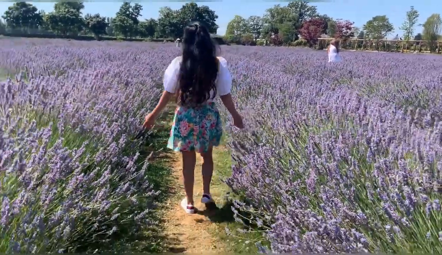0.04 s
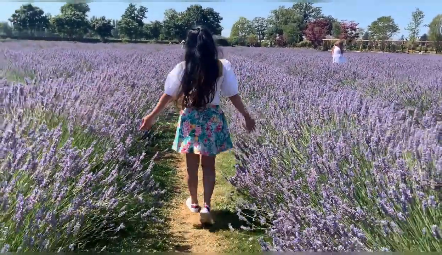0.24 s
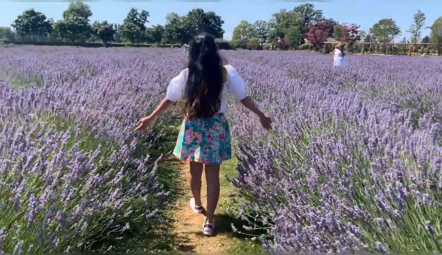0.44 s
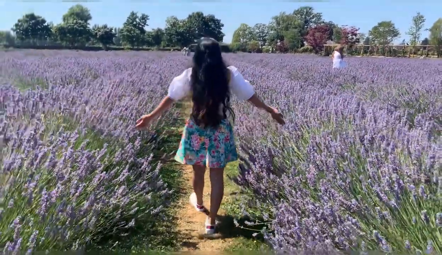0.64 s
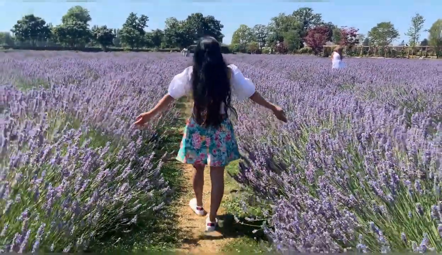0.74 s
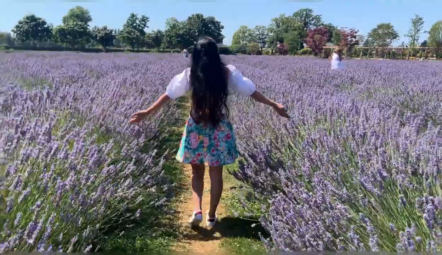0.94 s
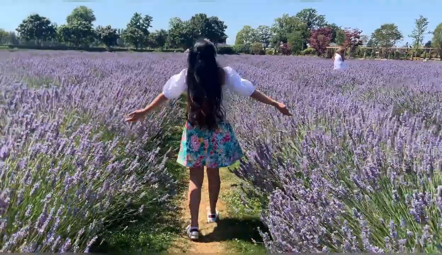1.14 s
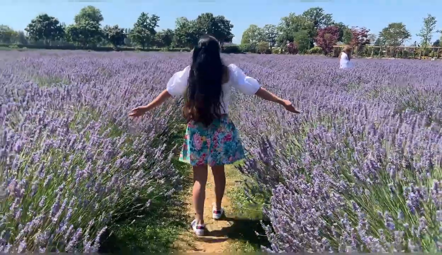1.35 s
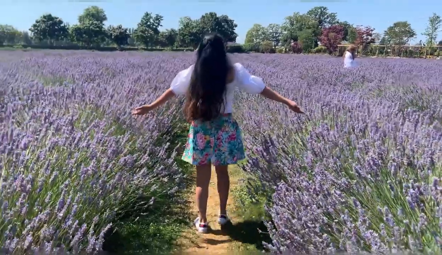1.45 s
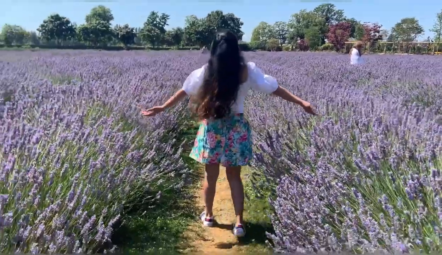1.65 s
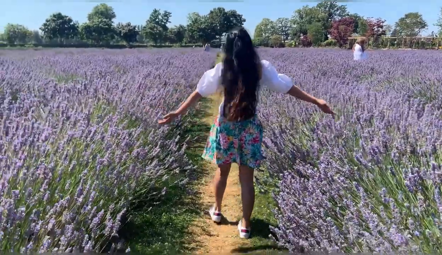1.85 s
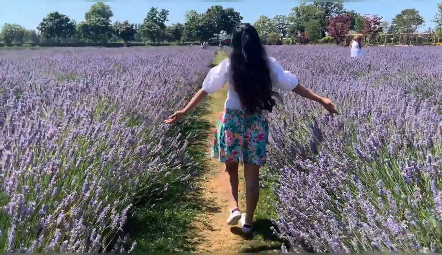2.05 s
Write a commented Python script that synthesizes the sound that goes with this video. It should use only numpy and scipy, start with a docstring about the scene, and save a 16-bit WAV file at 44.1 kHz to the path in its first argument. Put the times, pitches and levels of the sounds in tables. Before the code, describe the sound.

Low, uneven wind gusts buffet the microphone outdoors, swelling in the middle and then easing. Faint bees, light footsteps and brushing stems sit beneath, while faraway birds whistle, trill and give three short harsh calls.

```python
"""Bees in a windy field.

Bees hum over flowers, one insect passes, and gusts buffet the microphone.
Stems swish and soft steps scuff a dry path. Far off, small birds whistle, trill and chirp,
and a larger bird gives three short, harsh calls. Wingbeats and birds are wandering sines;
wind, leaves and steps are shaped noise, with short tone pulses for the eddies."""
import sys
import numpy as np
from scipy import signal
from scipy.fft import rfft, irfft
from scipy.io import wavfile

SR = 44100
rng = np.random.default_rng(int(sys.argv[2]) if len(sys.argv) > 2 else 0)


def bounce(signal):
    """Save signal as a 16-bit WAV file at the path given by the first command-line argument."""
    frames = np.transpose(np.atleast_2d(signal))
    limited = np.clip(frames, -1, 1)
    pcm = np.round(limited * 32767).astype(np.int16)
    wavfile.write(sys.argv[1], SR, pcm)


N = 92610
T = np.arange(N) / SR

# wind at the microphone, before trim: time_s, rumble_db, flutter_db
WIND_LEVELS = [(0, -44.5, -70), (0.061, -52.5, -68), (.15, -42, -65.5), (.205, -47, -61),
               (.25, -41.5, -48.5), (0.329, -39, -58), (.4, -50, -64), (.44, -41, -64), (0.479, -35, -57),
               (.55, -39.5, -58), (.6, -37, -68), (.65, -43, -76), (.73, -39.5, -66), (.765, -35.5, -36),
               (.81, -26.5, -32.5), (0.858, -37, -57), (0.93, -42.5, -48.5), (0.972, -36, -38.5),
               (1.021, -27.5, -45), (1.08, -44, -44.5), (1.14, -33, -37.5), (1.208, -38.5, -42),
               (1.28, -49.5, -52.5), (1.368, -40.5, -55), (1.43, -50.5, -65), (1.51, -41.5, -57.5),
               (1.72, -50.5, -50), (1.789, -40.5, -57), (1.9, -47.5, -58.5), (2.1, -53.5, -55.5)]
# side over mid, wide then central: time_s, rumble_db, flutter_db
WIND_WIDTH = [(0, 4.5, 10), (.53, -3.5, 13), (.62, -37, 14), (.75, -53, -31), (2.1, -50, -34)]
# low wind band: freq_hz, density_db
RUMBLE_SPECTRUM = [(10, -45), (25, -13), (38, -9.5), (54, 0), (80, -4.5), (120, -13), (170, -28),
                   (300, -60), (600, -105)]
# upper wind band: freq_hz, density_db
FLUTTER_SPECTRUM = [(60, -36), (110, 0), (165, -1), (230, -11.5), (300, -27), (420, -28), (600, -53),
                    (1500, -83)]
# wingbeat partials: harmonic, level_db, port_scatter_rad
BEE_PARTIALS = [(1, -63.5, 0.21), (2, -61, 1), (4, -72.5, 0.75), (5, -74.5, 0.65)]
# swell of the hum: time_s, gain_db
HUM_SWELL = [(0, 1), (.33, -2), (.7, -1), (1.25, -0.5), (1.5, 4), (1.78, 0.5), (2.1, 3)]
# far air and leaves: freq_hz, density_db
AIR_SPECTRUM = [(30, 12), (150, 0), (300, 1.5), (520, -1.5), (680, -2), (850, -2.5), (960, -1.5), (1070, 3),
                (1300, 0), (1650, -2.5), (2200, -10), (2800, -10), (3500, -15.5), (4800, -18),
                (6500, -19.5), (8000, -28.5), (12000, -21.5), (16000, -31.5)]
# left-right likeness of the air: freq_hz, correlation
AIR_CORRELATION = [(100, 1), (300, 0.64), (470, -0.043), (620, -0.46), (900, -0.25), (1400, 0.2),
                   (2100, -0.25), (2700, 0.12), (3200, -0.33), (4300, 0.31), (6000, -0.26), (16000, 0.13)]
# stems brushing past: peak_s, sigma_s, level_db
SWISHES = [(.01, 0.073, -70.5), (.268, 0.021, -65), (.725, 0.029, -69), (.88, 0.055, -62.5),
           (1.028, 0.026, -61.5), (1.235, 0.012, -66.5), (1.55, 0.085, -68.5), (1.62, .002, -67),
           (1.685, 0.039, -65.5), (1.83, 0.04, -65.5), (1.96, 0.061, -66.5), (1.996, 0.018, -67)]
# stem noise: freq_hz, density_db
SWISH_SPECTRUM = [(300, -3), (1200, 24), (2500, 19.5), (4500, 17), (7000, 8), (11000, 10.5), (15000, 5.5)]
# footfalls: peak_s, sigma_s, level_db, centre_hz
SCUFFS = [(0.038, 0.016, -62, 1075), (0.106, 0.038, -62, 1100), (0.322, 0.012, -60.5, 1070),
          (0.879, 0.0072, -61.5, 1280), (1.029, 0.0073, -51.5, 1070), (1.185, 0.013, -57.5, 1080),
          (1.629, 0.0073, -54.5, 1310)]
# footfall noise: centre_ratio, density_db
SCUFF_SPECTRUM = [(.3, -10), (.7, -12), (1, 10), (1.3, -10), (2, -25.5), (5.5, -29)]
# sharp gust edges: peak_s, sigma_s, level_db
GUST_EDGES = [(.28, 0.0099, -55), (.875, 0.025, -53.5), (.97, 0.01, -48), (1.075, 0.012, -42),
              (1.135, 0.014, -48), (1.2, 0.01, -48.5)]
# gust edge noise: freq_hz, density_db
GUST_EDGE_SPECTRUM = [(120, -46), (230, 10.5), (330, 1.5), (450, -6.5), (600, -23), (1200, -52)]
# long bird note: time_s, pitch_hz, level_db
WHISTLE_CONTOUR = [(.4, 4670, -85), (.49, 4595, -72.5), (.55, 4500, -65), (.572, 4510, -75),
                   (.64, 4527, -65.5), (.7, 4505, -67.5), (.755, 4445, -65.5), (.838, 4415, -65),
                   (.865, 4500, -69), (.895, 4340, -85)]
# harsh calls: start_s, length_s, first_hz, last_hz, level_db
CAWS = [(0.449, 0.064, 1910, 2120, -61.5), (1.33, 0.074, 1842, 2160, -55),
        (1.495, 0.075, 2237, 1935, -65.5)]
# lines of a harsh call: pitch_ratio, relative_db
CAW_LINES = [(0.81, -6.5), (0.903, -10), (1, -1), (1.096, -15), (1.189, -10), (1.267, -7)]
# eddies at the microphone: peak_s, level_db, centre_hz
EDDIES = [(0.488, -36, 175), (0.763, -23.5, 130), (0.8, -27, 162), (0.81, -24, 80.5), (0.851, -24, 109),
          (0.879, -31.5, 131.5), (1.077, -30, 185), (1.121, -38, 302), (1.136, -38.5, 312),
          (1.199, -25.5, 122)]
# buzzy trills: start_s, length_s, first_hz, last_hz, rate_hz, level_db, fade_db, port_rad
TRILLS = [(0.655, 0.32, 2810, 2900, 220, -69.5, 4, 2.15), (0.98, 0.38, 4736, 4600, 207, -64, 12, 1.55),
          (1.894, .115, 4500, 4050, 127, -68, 8, 1.1)]
# passing insect: time_s, wingbeat_hz, level_db
FLY_PASS = [(1.26, 307.6, -76), (1.4, 332.4, -63.5), (1.47, 341, -78.5), (1.58, 277.4, -70),
            (1.69, 238.4, -56), (1.8, 212, -72)]
# quick bird notes: start_s, length_s, first_hz, last_hz, arch_hz, level_db
CHIRPS = [(1.395, 0.046, 5200, 3770, -5, -75.5), (1.484, 0.067, 3560, 3510, 716, -69.5),
          (1.667, 0.035, 4996, 3550, 54, -75), (1.747, 0.064, 3610, 3530, 695, -67.5)]

WING_JITTER, WING_JITTER_HZ = .0219, 24.55


def amp(db):
    """Decibels to gain."""
    return 10 ** (np.asarray(db) / 20)


def unit(x):
    """Scales to rms 1."""
    return x / np.sqrt(np.mean(abs(x) ** 2) + 1e-20)


def log_interp(table, hz):
    """Reads a table on a log-frequency axis."""
    freq_hz, value = np.transpose(table)
    return np.interp(np.log(hz + 1), np.log(freq_hz + 1), value)


def curves(table):
    """Interpolates each column of a time table."""
    time_s, *columns = np.transpose(table)
    return [np.interp(T, time_s, column) for column in columns]


def drift(hz):
    """Low-passed random motion, rms about 1."""
    freq_hz = np.fft.rfftfreq(2 * N, 1 / SR)
    white = rfft(rng.standard_normal(2 * N))
    return unit(irfft(white * np.exp(-(freq_hz / hz) ** 2)))[:N]


def noise(spectrum, correlation=0):
    """Shaped stereo noise, rms 1; correlation is a number or a table."""
    hz = np.fft.rfftfreq(N, 1 / SR)
    if np.ndim(correlation):
        correlation = np.clip(log_interp(correlation, hz), -1, 1)
    mid, side = rfft(rng.standard_normal((2, N)))
    mid *= np.sqrt(1 + correlation)
    side *= np.sqrt(1 - correlation)
    return unit(irfft(np.array([mid + side, mid - side]) * amp(log_interp(spectrum, hz)), N))


def tone(hz, port_rad):
    """Sine of rms 1, with a phase difference between the two microphone ports."""
    phase = 2 * np.pi * (np.cumsum(hz) / SR + rng.random())
    return np.sqrt(2) * np.cos([phase, phase - port_rad])


def bursts(events, spectrum, grain_db, correlation=0):
    """Gaussian swells of grainy noise."""
    level = sum(amp(db) * np.exp(-.5 * ((T - peak_s) / sigma_s) ** 2) for peak_s, sigma_s, db in events)
    return level * noise(spectrum, correlation) * unit(amp(grain_db * drift(hz=504)))


def wind(smooth_s=.13):
    """Rumble and flutter at the microphone: levelled noise that follows the gusts."""
    out = np.zeros((2, N))
    window = signal.windows.hann(int(2 * smooth_s * SR))
    spectra, trims_db = (RUMBLE_SPECTRUM, FLUTTER_SPECTRUM), (-.5, -3)
    for spectrum, trim_db, db, width_db in zip(spectra, trims_db, curves(WIND_LEVELS), curves(WIND_WIDTH)):
        air = noise(spectrum)
        power = signal.fftconvolve(air ** 2, window[None] / window.sum(), "same", axes=1)
        mid, side = amp(db + trim_db) * air / np.sqrt(abs(power) + 1e-6)
        out += mid + np.outer([1, -1], amp(width_db) * side)
    return out


def bees(count=10, wingbeat_hz=209.13, spread=.045, wander=.022, swell_db=2.5, chorus_db=1.5):
    """Wingbeats wander and swell as bees move between flowers; the whole hum rises and falls."""
    out = np.zeros((2, N))
    for detune in np.sqrt(3) * spread * np.linspace(-1, 1, count):
        hz = wingbeat_hz * (1 + detune + wander * drift(hz=5.96) + WING_JITTER * drift(WING_JITTER_HZ))
        nearness = unit(amp(swell_db * drift(hz=3.8)))
        side = drift(hz=2.12)
        for harmonic, db, scatter_rad in BEE_PARTIALS:
            out += amp(db) * nearness * tone(harmonic * hz, side * scatter_rad)
    hum_db = curves(HUM_SWELL)[0] + chorus_db * drift(hz=24)
    return out * amp(hum_db) / np.sqrt(count)


def field(level_db=-57, swell_db=.4):
    """Soft wash of far air and leaves."""
    return amp(level_db + swell_db * drift(hz=21)) * noise(AIR_SPECTRUM, AIR_CORRELATION)


def stems():
    """Stems brush past in bright swishes."""
    return bursts(SWISHES, SWISH_SPECTRUM, grain_db=2)


def steps():
    """Each footfall scrapes the dry path with its own colour."""
    out = np.zeros((2, N))
    for peak_s, sigma_s, db, centre_hz in SCUFFS:
        spectrum = [(ratio * centre_hz, density_db) for ratio, density_db in SCUFF_SPECTRUM]
        out += bursts([(peak_s, sigma_s, db)], spectrum, grain_db=1.5)
    return out


def gust_edges():
    """Sharp gust edges hit the microphone as low puffs."""
    return bursts(GUST_EDGES, GUST_EDGE_SPECTRUM, grain_db=-.5, correlation=.74)


def whistle(waver_hz=8):
    """A small bird's thin, slowly sinking note."""
    hz, db = curves(WHISTLE_CONTOUR)
    gate = (T > WHISTLE_CONTOUR[0][0]) * (T < WHISTLE_CONTOUR[-1][0])
    return amp(db) * gate * tone(hz + waver_hz * drift(hz=83.6), port_rad=.68)


def caws(roughness=.012, port_rad=2.88):
    """A larger bird far to one side: gliding clusters of rough lines."""
    out = np.zeros((2, N))
    for start_s, length_s, first_hz, last_hz, db in CAWS:
        progress = np.clip((T - start_s) / length_s, 0, 1)
        hz = (first_hz + (last_hz - first_hz) * progress) * (1 + roughness * drift(hz=407))
        voice = unit(sum(amp(line_db) * tone(ratio * hz, port_rad) for ratio, line_db in CAW_LINES))
        out += amp(db) * np.sin(np.pi * progress) * voice
    return out


def eddies(half_width_cycles=.68):
    """Single eddies slap both ports with a low pulse."""
    out = np.zeros(N)
    for peak_s, db, hz in EDDIES:
        cycles = hz * (T - peak_s)
        out += amp(db) * np.cos(2 * np.pi * cycles) * np.exp(-(cycles / half_width_cycles) ** 2)
    return out


def trills(sweep_depth_hz=330, rate_jitter=.008, rough_hz=168):
    """Small birds' rapid downward sweeps blur into a buzz."""
    out = np.zeros((2, N))
    for start_s, length_s, first_hz, last_hz, rate_hz, db, fade_db, port_rad in TRILLS:
        progress = np.clip((T - start_s) / length_s, 0, 1)
        cycle = np.cumsum(rate_hz * (1 + rate_jitter * drift(hz=28.4))) / SR % 1
        centre_hz = first_hz + (last_hz - first_hz) * progress
        hz = centre_hz + sweep_depth_hz * (1 - 2 * cycle) + rough_hz * drift(hz=490)
        envelope = amp(db - fade_db * progress) * np.sqrt(abs(np.sin(np.pi * progress)))
        pulses = unit(np.sin(np.pi * cycle) ** 2)
        out += envelope * pulses * tone(hz, port_rad)
    return out


def fly():
    """One insect passes; its wingbeat rises, then sinks."""
    hz, db = curves(FLY_PASS)
    gate = (T > FLY_PASS[0][0]) * (T < FLY_PASS[-1][0])
    return amp(db) * gate * tone(hz * (1 + WING_JITTER * drift(WING_JITTER_HZ)), port_rad=0)


def chirps(roughness=.009, flicker_db=1.5):
    """Small birds' quick falling or arched notes."""
    out = np.zeros((2, N))
    for start_s, length_s, first_hz, last_hz, arch_hz, db in CHIRPS:
        progress = np.clip((T - start_s) / length_s, 0, 1)
        arch = np.sin(np.pi * progress)
        hz = first_hz + (last_hz - first_hz) * progress + arch_hz * arch
        hz *= 1 + roughness * drift(hz=400)
        envelope = amp(db + flicker_db * drift(hz=89)) * np.sqrt(abs(arch))
        out += envelope * tone(hz, port_rad=-.32)
    return out


def scatter(dry, echo_db=-8, t60_s=.22):
    """Trees and plants add a faint, short tail."""
    tail = rng.standard_normal((2, N)) * amp(-60 * T / t60_s)
    tail /= np.linalg.norm(tail[0])
    return dry + amp(echo_db) * signal.fftconvolve(dry, tail, axes=1)[:, :N]


def scene():
    """Wind, insects, field, walking and birds."""
    gusts = wind() + gust_edges() + eddies()
    insects = bees() + fly()
    walking = stems() + steps()
    return gusts + insects + field() + walking + scatter(whistle() + trills() + chirps() + caws())


def record(dry, cutoff_hz=15950):
    """Steep low-pass band limit."""
    lowpass = signal.firwin(511, cutoff_hz, window=("kaiser", 9), fs=SR)
    return signal.oaconvolve(dry, lowpass[None], "same")


dry = scene()
out = record(dry)
bounce(out)
```